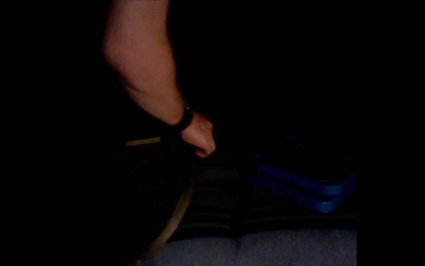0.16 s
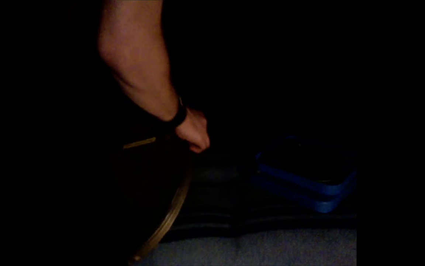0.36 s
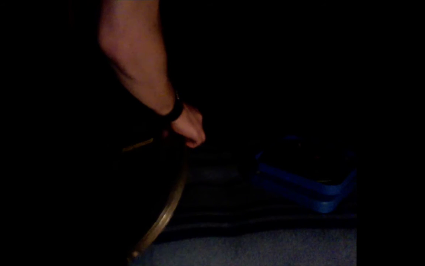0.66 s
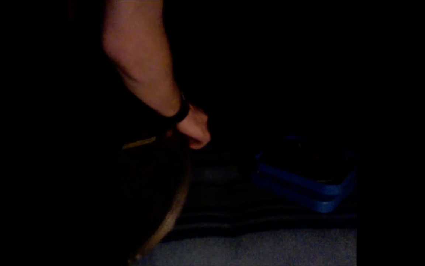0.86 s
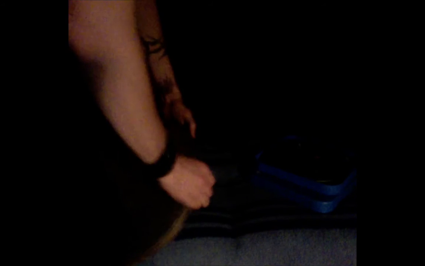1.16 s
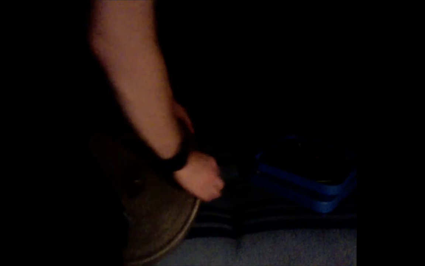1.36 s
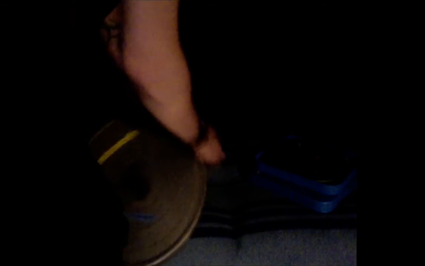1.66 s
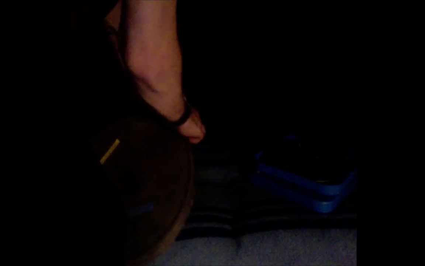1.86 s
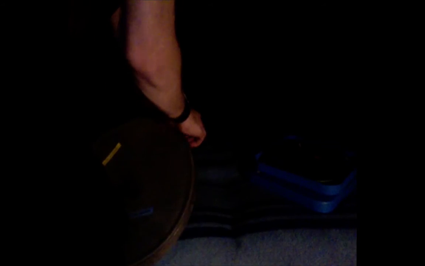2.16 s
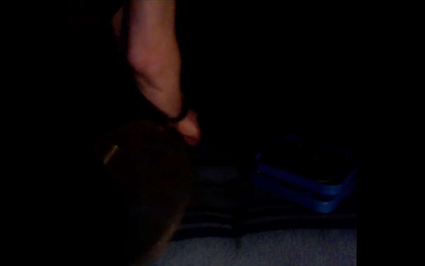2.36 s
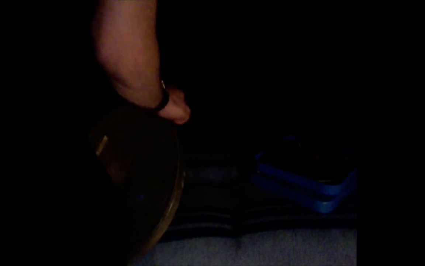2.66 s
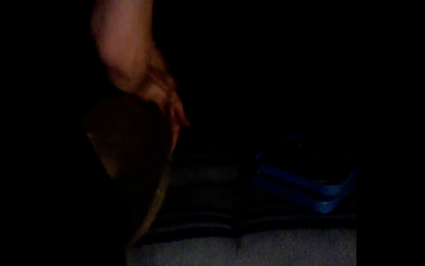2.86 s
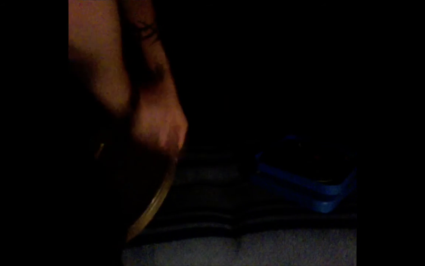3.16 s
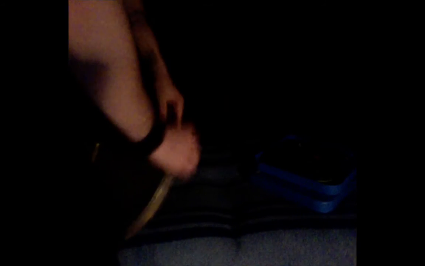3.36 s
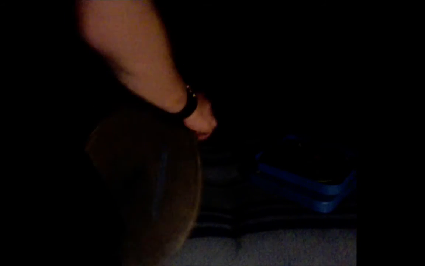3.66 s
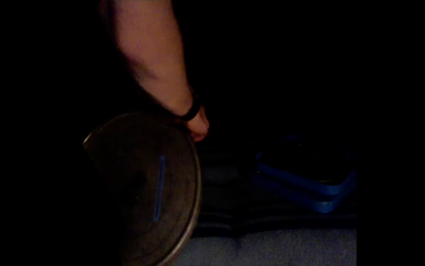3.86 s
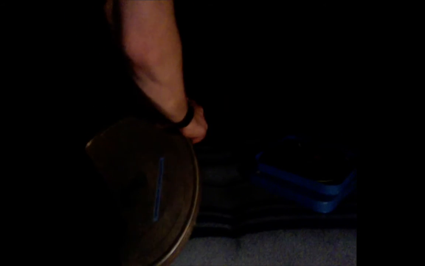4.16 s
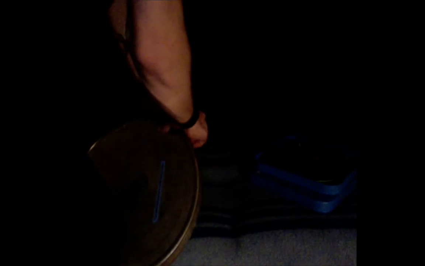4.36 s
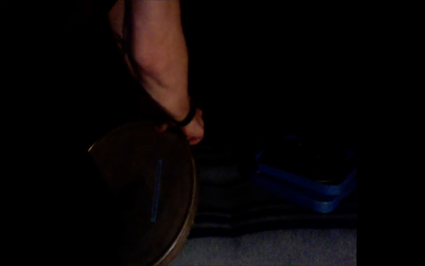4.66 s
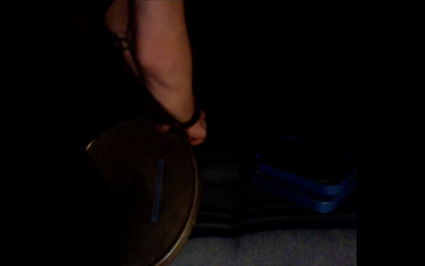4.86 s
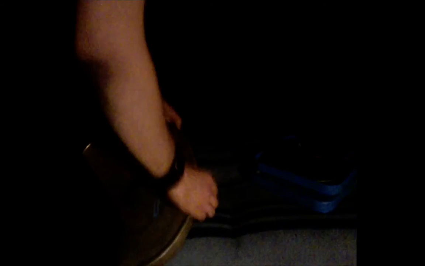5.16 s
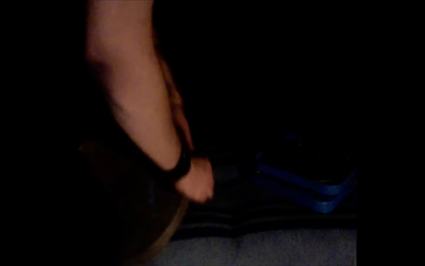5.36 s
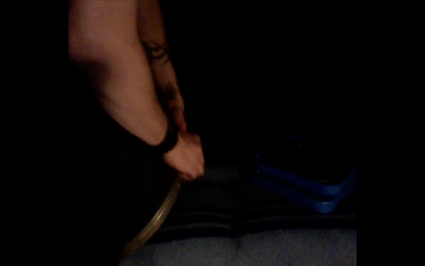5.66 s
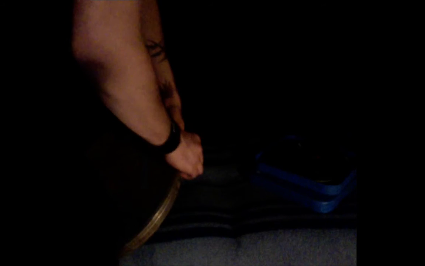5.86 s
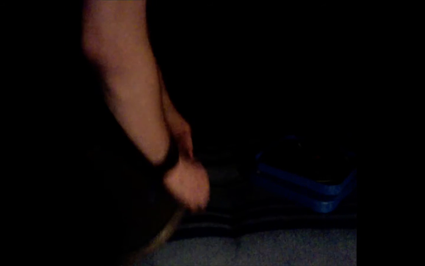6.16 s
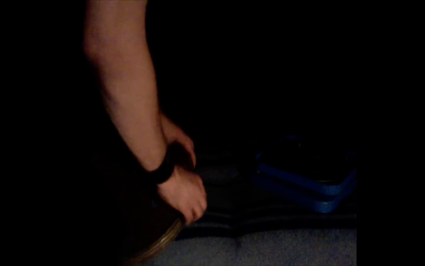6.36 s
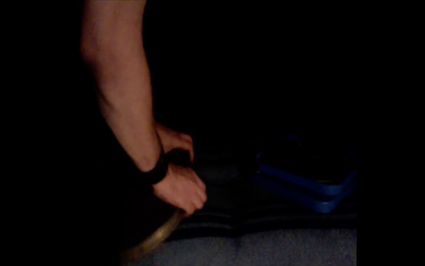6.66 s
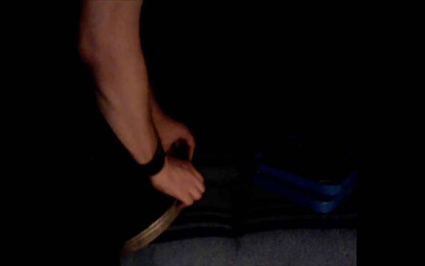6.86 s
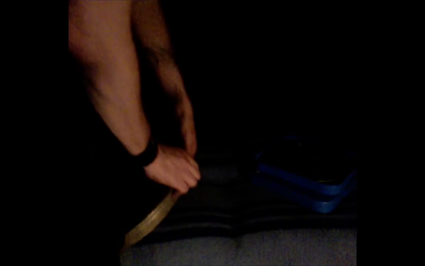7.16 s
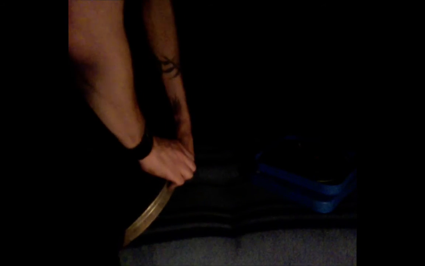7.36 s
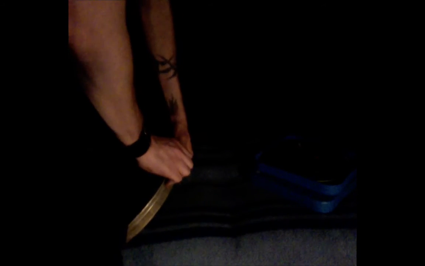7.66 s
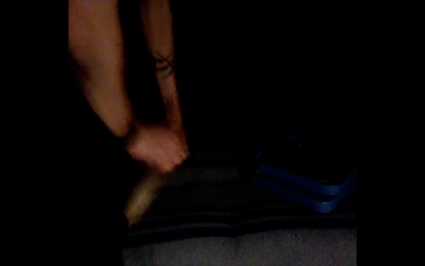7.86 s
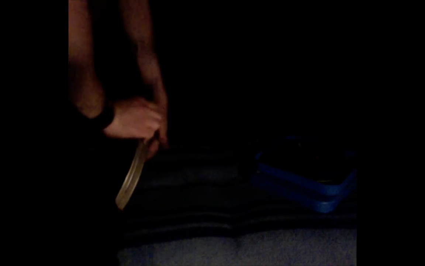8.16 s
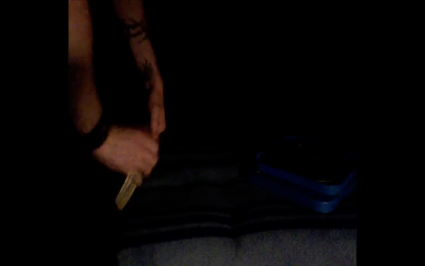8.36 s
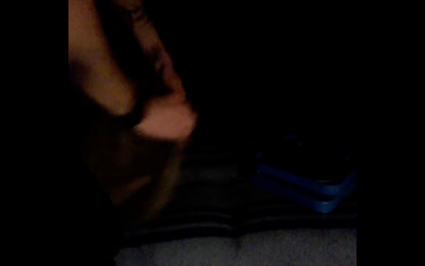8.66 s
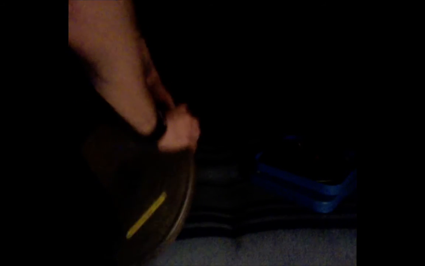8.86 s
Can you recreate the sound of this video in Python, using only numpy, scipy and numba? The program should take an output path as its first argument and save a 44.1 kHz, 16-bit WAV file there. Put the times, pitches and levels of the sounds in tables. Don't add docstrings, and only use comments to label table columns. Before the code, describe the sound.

Close tinny scraping, clicking and dull hollow clanks as a big metal can's tight lid is worked by hand in a quiet room.

```python
import sys
import numpy as np
from scipy import signal
from scipy.fft import rfft, irfft, next_fast_len
from scipy.io import wavfile
from scipy.ndimage import uniform_filter1d
from numba import njit

SR = 44100
rng = np.random.default_rng(int(sys.argv[2]) if len(sys.argv) > 2 else 0)


def rack_gain(trim_db):
    fader = np.asarray(trim_db, float)
    return 10 ** (fader / 20)


def transcribe(signal):
    frames = np.atleast_2d(signal).T
    limited = np.clip(frames, -1, 1)
    pcm = np.round(limited * 32767).astype(np.int16)
    wavfile.write(sys.argv[1], SR, pcm)


N = 397766

# f/Hz, level/dB, share of the ring time/1
BODY_MODES = [(88, -14, 0.86), (168.6, -10, 0.95), (204.5, -8.5, 1.2), (257.8, -9.5, 1.33),
              (320, -4.5, 1.15), (366.7, -1.5, 1.1), (399.8, 0, 0.75), (458, -10, 2.16),
              (525.5, -2.5, 1.28), (611.3, -6, 1.21), (660, -8, 0.87), (735.3, -9.5, 1.23),
              (810, -11.5, 0.94), (879, -10, 0.68)]
# f/Hz, level/dB, share of the ring time/1
LID_MODES = [(1094, -6, 0.53), (1153, -19.5, 0.93), (1231, -9.5, 0.45), (1339, -5.5, 0.52),
             (1463, -6.5, 0.4), (1672, -7, 0.43), (1916, -6.5, 0.33)]
# f/Hz, width/Hz, level/dB
RIM_MODES = [(2222, 380, -12), (2676, 270, 1.5), (3028, 310, 4), (3625, 540, 0), (4314, 300, 3),
             (4650, 320, -2), (5640, 400, 0), (6200, 260, -9), (6620, 520, -10)]
# f/Hz, width/Hz, level/dB
EDGE_MODES = [(7830, 1600, 1), (9720, 780, -3.5), (10910, 1180, -6.5), (13700, 780, -12),
              (14670, 1100, -20)]
THUMP_WEIGHT_DB = -9


def level(x, db):
    return x * rack_gain(db) / np.sqrt(np.mean(x ** 2))


def band(x, hz, width):
    return signal.lfilter(*signal.iirpeak(hz, hz / width, SR), x)


def walk(rate):
    k = int(SR / rate)
    held = np.repeat(rng.standard_normal(N // k + 1), k)
    return 1.97 * uniform_filter1d(held, k)[:N]


def curves(table):
    s, *columns = np.transpose(table)
    return [np.interp(np.arange(N) / SR, s, c) for c in columns]


def favour(hz, pitch_hz, lift_db, octaves):
    return lift_db * np.exp(-(np.log2(hz / pitch_hz) / octaves) ** 2)


def hush():
    # f/Hz, density/dB per Hz
    spectrum = [(59, -22.5), (81, -0.5), (449, -5.5), (962, -14), (1190, -8), (2060, -12.5), (6000, -21),
                (16000, -42.5)]
    hz, db = np.transpose(spectrum)
    size = next_fast_len(N)
    bins = np.fft.rfftfreq(size, 1 / SR) + 1
    shape = rack_gain(np.interp(np.log(bins), np.log(hz), db))
    air = irfft(rfft(rng.standard_normal(N), size) * shape, size)[:N]
    return level(air * rack_gain(1.5 * walk(12.0)), -68.5)


def stroke(s, level_db, rise, fade, hold=0):
    t = np.arange(N * 1000 // SR + 2) / 1000 - s
    sag_db_s = 56
    swell = rise * np.minimum(t, 0)
    return rack_gain(level_db + swell - sag_db_s * np.clip(t, 0, hold) - fade * np.maximum(t - hold, 0))


def spread(gain):
    return np.interp(np.arange(N) * 1000 / SR, np.arange(len(gain)), gain)


def force():
    # t/s, level/dB
    grip_creep = [(0, -73), (1.3, -65.5), (1.56, -55), (2.23, -72), (3.2, -66), (3.6, -68), (3.9, -65),
                  (4.44, -74.5), (4.7, -76), (5.1, -63), (5.47, -70), (5.71, -59), (5.82, -72),
                  (6.25, -61.5), (6.5, -66.5), (6.8, -99), (8.3, -65), (9.02, -71)]
    # t of full force/s, build-up/s, hold/s, level/dB, lid buzz/dB
    drag_table = [(0.052, 0.067, 0.0048, -46.5, -19), (0.757, 0.17, 0.13, -44.5, -10.5),
                  (1.001, 0.62, 0.01, -36.5, -8.5), (1.123, 0.19, 0.029, -54.5, 2),
                  (1.404, 0.03, 0.02, -35, -26), (2.358, 0.041, 0.015, -34.5, -2.5),
                  (2.413, 0.013, 0.064, -28.5, -18), (2.515, 0.026, 0.05, -43, 1.5),
                  (2.901, 0.1, 0.049, -38.5, -7), (3.377, 0.037, 0.0037, -34, -4),
                  (3.629, 0.029, 0.056, -36, -2), (3.722, 0.078, 0.081, -43, 0.5),
                  (4.976, 0.064, 0.11, -50.5, -30), (6.046, 0.008, 0.07, -51.5, -25),
                  (6.135, 0.18, 0.04, -49, -23), (6.65, 0.033, 0.013, -64.5, -6),
                  (5.257, 0.03, 0.0034, -31.5, -20), (7.187, 0.2, 0.013, -53, -38),
                  (7.742, 0.015, 0.21, -46.5, 4), (7.95, 0.26, 0.084, -33, -3),
                  (8.193, 0.016, 0.041, -36.5, -20), (8.851, 0.045, 0.025, -44.5, -1.5),
                  (8.805, 0.16, 0.0092, -55, -12)]
    # t/s, level/dB, fade/(dB/s), lid buzz/dB
    jolt_table = [(.305, -99, 114, -1), (.439, -63, 374, 15), (0.531, -41, 161, 3.5),
                  (1.273, -54.5, 171, -4), (1.303, -66, 283, -1), (2.247, -62.5, 166, 21),
                  (2.47, -34, 305, 2), (1.438, -47.5, 154, -13), (2.843, -53, 107, 4),
                  (3.279, -49.5, 178, -13), (4.498, -58.5, 363, -17), (4.574, -71, 197, 0),
                  (4.872, -39.5, 270, 7), (5.268, -39, 152, 1), (5.863, -68.5, 229, 9),
                  (5.933, -53, 185, -60), (6.517, -42, 284, 10.5), (6.392, -80, 298, -7),
                  (6.631, -57.5, 191, 10), (7.075, -66, 59, -10), (7.35, -42.5, 266, 0.5),
                  (7.456, -49.5, 201, 5.5), (7.561, -40, 215, 7.5), (7.716, -45.5, 246, -23),
                  (7.883, -42.5, 300, 4), (1.014, -39.5, 239, 4), (.5, -56.5, 300, 8),
                  (1.385, -49, 500, -22), (8.352, -65, 159, 15), (5.11, -77, 193, -7),
                  (8.401, -72, 276, 19), (8.466, -77, 351, 21), (8.562, -64, 302, 25.5)]
    # t of full force/s, build-up/s, hold/s, level/dB, lid buzz/dB
    slide_table = [(0.942, 0.032, 0.052, -54, -21), (1.16, 0.045, 0.024, -61.5, -26),
                   (2.314, 0.034, 0.027, -45.5, 2), (3.557, 0.022, 0.016, -67, -28),
                   (4.939, 0.11, 0.1, -55, -28.5), (5.04, 0.06, 0.033, -56, -25),
                   (5.248, 0.0076, 0.016, -59, -13), (6.054, 0.015, 0.056, -59, -23),
                   (6.152, 0.079, 0.059, -57, -11), (5.955, 0.032, 0.062, -69, -19),
                   (7.758, .008, 0.069, -48, -11), (7.364, 0.027, 0.015, -61, 8),
                   (8.186, 0.0093, 0.033, -58, -21), (2.9, 0.086, 0.04, -47, 5),
                   (7.881, 0.082, 0.17, -47, -18), (8.892, 0.059, 0.058, -61, -24)]
    jolt_rise_db_s, build_db = 6000, 51
    jolt_dry_db, drag_dry_db, slide_dry_db, grip_dry_db = -22.5, -20, -5.5, -13
    gestures = []
    for s, db, fade, buzz in jolt_table:
        gestures.append((stroke(s, db, jolt_rise_db_s, fade), jolt_dry_db, buzz))
    for s, build, hold, db, buzz in drag_table:
        let_go = 214.5 + 10.5 / build
        gestures.append((stroke(s, db, build_db / build, let_go, hold), drag_dry_db, buzz))
    for s, build, hold, db, buzz in slide_table:
        gestures.append((stroke(s, db, build_db / build, 452, hold), slide_dry_db, buzz))
    gains = sum(gain * rack_gain([[0], [dry_db - 0.27 * buzz], [buzz]]) for gain, dry_db, buzz in gestures)
    resting = rack_gain(curves(grip_creep)[0]) * rack_gain([[0], [grip_dry_db], [0]])
    return np.array([spread(g) for g in gains]) + resting


def grit(rate, spread_db):
    slips = (rng.random(N) < rate / SR) * np.clip(rng.standard_normal(N), -2, 2)
    return slips * rack_gain(spread_db * np.minimum(rng.exponential(size=N), 3.6))


def shifting(source, table, drift_db, spot_hz=1, lift_db=1.5):
    sources = source(), source()
    total = 0
    for k, (hz, width, db) in enumerate(table):
        gain = rack_gain(db + drift_db * walk(14) + favour(hz, spot_hz, lift_db, 0.27))
        steep = band(band(sources[k % 2], hz, 2.57 * width), hz, 3.14 * width)
        total = total + gain * steep * (-1) ** k
    return level(total, 0)


def scrape():
    # t/s, f/Hz
    rim_spot = [(0, 3000), (.7, 3000), (.85, 4500), (.97, 4470), (1.03, 2400), (1.4, 3980), (2.3, 4410),
                (2.9, 3160), (3.3, 5000), (3.38, 2780), (3.75, 4400), (5, 3600), (5.27, 2970), (6.1, 3270),
                (7.5, 2940), (7.9, 3800), (8.24, 4640), (8.45, 2485)]
    # t/s, f/Hz
    lid_spot = [(0, 1267), (.7, 1602), (1.3, 1283), (2.3, 1516), (3.4, 1660), (4.9, 1424), (6.5, 1147),
                (7.4, 1600), (7.9, 1290), (8.2, 1880), (8.6, 1820)]

    def rough():
        return grit(9000, 2.8)

    on_rim, on_edge, on_lid = force() * rack_gain(1.2 * walk(60) + 0.6 * walk(230))
    lid_bands = [(hz, 90, db) for hz, db, _ in LID_MODES]
    rim = shifting(rough, RIM_MODES, 1.7, curves(rim_spot)[0]) * on_rim
    edge = shifting(rough, EDGE_MODES, 2.24) * on_edge * rack_gain(0.5)
    lid = shifting(rough, lid_bands, 1.4, curves(lid_spot)[0], lift_db=2.5) * on_lid * rack_gain(-5.5)
    return (rim + edge + lid) * rack_gain(-5.0)


def body_rumble():
    # t/s, level/dB, swell/(dB/s), fade/(dB/s)
    rumble_table = [(.07, -60, 296, 44), (.33, -53, 406, 83), (.545, -33, 398, 202), (.75, -73, 300, 40),
                    (.93, -46.5, 122, 74), (1.05, -74, -3, 66), (1.25, -49.5, 74, 61), (1.62, -64, 43, 9),
                    (2.451, -22, 196.5, 247), (2.56, -53, 202, 208), (2.93, -45.5, 321, 123),
                    (3.372, -51, 783, 196), (3.78, -79, 85, 206), (3.624, -39, 2002, 86),
                    (4.15, -61, 62, 97), (4.26, -65, 200, 197), (4.372, -58, 2000, 104),
                    (4.45, -62, 2000, 201), (4.63, -62, 84, 252.5), (4.91, -39, 491, 151),
                    (5.29, -49.5, 392, 120), (5.66, -62, 48, 53), (5.95, -62, 74, 48),
                    (6.054, -57, 1500, 195), (6.36, -65, 34, 82), (6.547, -27.5, 598, 231),
                    (7.09, -77, 583, 105), (7.18, -77, 309, 90), (7.3, -56.5, 100, 100),
                    (7.4, -51.5, 69.5, 49), (7.598, -41, 121, 205), (7.8, -46, 499, 252),
                    (7.84, -32.5, 251, 82), (8.02, -46, 100, 300), (8.3, -60.5, 67, 88),
                    (8.87, -44, 236, 215)]
    press = grit(400, 1.0) * rack_gain(1.8 * walk(25))
    roll_off_db = -4
    modes = [(hz, 30, db + roll_off_db * max(np.log2(hz / 450), 0)) for hz, db, _ in BODY_MODES]
    body = shifting(lambda: press, modes, 2.0)
    return body * spread(sum(stroke(*row) for row in rumble_table)) * rack_gain(-2.5)


@njit
def ring(hz, t60, gain, rise, size):
    y = np.zeros(size)
    for k in range(len(hz)):
        turn = np.exp((2j * np.pi * hz[k] - np.log(1000) / t60[k]) / SR)
        z = gain[k] + 0j
        q, rest = np.exp(-1 / (rise[k] * SR)), 1.
        for i in range(size):
            y[i] += z.imag * (1 - rest)
            z *= turn
            rest *= q
    return y


def add(out, s, sound, peak_db):
    i = int(s * SR)
    sound = sound[:N - i]
    out[i:i + len(sound)] += sound * rack_gain(peak_db) / np.abs(sound).max()


def knocks(blows):
    out = np.zeros(N)
    hz, db, share = np.repeat(np.transpose(BODY_MODES + LID_MODES), repeats=2, axis=1)
    lid_hz = LID_MODES[0][0]
    lid, deep = hz >= lid_hz, hz <= BODY_MODES[3][0]
    chance = rng.standard_normal((len(blows), 5, len(hz)))
    lags = rng.random((len(blows), 2))
    for blow, (detune, uneven, *sides), lag in zip(blows, chance, lags):
        s, peak_db, pitch, t60, bright_db, weight_db = blow
        colour_db = favour(hz, pitch, 9.0, 0.28)
        colour_db += lid * (bright_db + 12.5 - 8 * np.log2(hz / lid_hz))
        colour_db += deep * (weight_db + 21.5)
        colour_db += (weight_db - THUMP_WEIGHT_DB) * np.clip(np.log2(pitch / hz) - .4, 0, 1)
        gain = rack_gain(db + 3.26 * uneven + colour_db)
        tuned = hz * (1 + np.where(deep, .012, .025) * detune)
        life = 1.83 * np.clip(t60, .02, .3) * share
        rise = 0.68 / hz
        delays = [0, 0.004067 + 0.00801 * lag[0], .014 + 0.017 * lag[1]]
        for side, late, drop_db in zip(sides, delays, [-4, -13.5, -17]):
            sound = ring(tuned, life, gain * np.sign(side), rise, size=10000)
            add(out, s - .0002 + late, sound, peak_db + drop_db)
    return out


def hand_blows():
    # t/s, peak level/dB, favoured f/Hz, ring time/s, brightness/dB
    palms = [(.028, -40.5, 356, 0.084, -13), (.292, -14, 327, 0.05, -28), (.437, -23, 322, 0.026, -11.5),
             (.499, -30.5, 388, 0.023, -9), (.53, -21.5, 354.6, 0.049, -9), (.881, -39, 540, 0.11, -16),
             (1.434, -28, 347, 0.017, 2.5), (2.12, -30, 500, 0.071, -22), (2.225, -29.5, 383, 0.076, -30),
             (2.315, -24.5, 430, 0.074, -19), (2.353, -19, 320, 0.047, -13), (2.429, -7, 360, 0.11, -14.5),
             (2.895, -24, 320, 0.083, -13), (3.643, -20, 437, 0.063, -7), (4.052, -38, 464, 0.068, -17),
             (7.381, -30.5, 740, 0.057, -12.5), (7.456, -29.5, 384, 0.021, -7),
             (8.038, -19, 460, 0.042, -10.5), (8.793, -40, 318, 0.03, -24), (8.831, -32, 403, 0.14, -7)]
    # t/s, peak level/dB, favoured f/Hz, ring time/s, brightness/dB
    taps = [(.077, -35, 400, 0.081, -15), (.19, -44, 342, 0.056, -14), (1.268, -33, 1220, 0.076, -16),
            (1.381, -33, 1320, 0.17, 4), (1.24, -41.5, 397, 0.056, -7), (1.383, -33, 400, 0.032, -11),
            (2.299, -39, 450, 0.029, -28), (3.585, -44.5, 520, 0.019, -31), (5.256, -42, 496, 0.037, -16),
            (2.84, -37, 406, 0.15, -16), (3.099, -36.5, 400, 0.031, -13), (3.405, -34.5, 380, 0.058, 2.5),
            (4.228, -35.5, 384, 0.091, -23), (4.87, -21.5, 483, 0.098, -14), (5.27, -32, 700, 0.12, -23),
            (5.614, -41, 384, 0.085, -19), (5.716, -36, 476, 0.028, -28), (5.856, -39, 398, 0.04, -21),
            (5.943, -35, 413, 0.06, -21), (7.884, -27.5, 660, 0.076, -5), (8.397, -36.5, 480, 0.02, -11),
            (8.466, -35.5, 870, 0.055, 0.5), (8.561, -35.5, 865, 0.044, -5.5)]
    # t/s, peak level/dB, favoured f/Hz, ring time/s, brightness/dB
    regrips = [(.62, -40, 486, 0.041, -13), (.742, -45, 561.6, 0.09, -25), (1.024, -30, 333, 0.034, -27),
               (2.072, -46, 380, 0.062, -30), (2.249, -52, 1850, 0.064, 10), (6.049, -41.5, 537, 0.11, -15),
               (6.59, -33.5, 540, 0.066, -21), (7.095, -49, 356.4, 0.056, -30),
               (7.161, -42.5, 338.9, 0.063, -27), (7.225, -53, 416.7, .04, -15),
               (7.282, -43, 369, 0.063, -21), (7.79, -28, 185.2, 0.068, -32), (7.96, -21, 189, 0.051, -35),
               (8.1, -35, 453.6, 0.039, -25), (8.197, -53, 1890, 0.071, 10), (8.396, -41, 2106, 0.099, 5),
               (8.465, -39, 2106, 0.11, 12), (8.56, -39, 2000, 0.097, 10), (8.655, -51.5, 350, 0.04, -20)]
    # t/s, peak level/dB, favoured f/Hz, ring time/s, brightness/dB
    thumps = [(1.009, -23, 340, 0.064, -36), (1.298, -30, 430, 0.093, -2), (2.089, -43, 390, 0.18, -12),
              (2.413, -23.5, 357, 0.073, 17), (4.122, -34, 382, 0.033, -8.5),
              (4.494, -30.5, 390, 0.056, -12.5), (4.563, -35.5, 393, 0.13, -20),
              (4.615, -37.5, 317, 0.025, -30), (3.621, -32, 415, 0.063, -15),
              (6.509, -20.5, 212, 0.061, -42), (6.5, -12.5, 480, 0.095, -22),
              (7.071, -35.5, 290, 0.056, -44), (7.559, -23, 407, 0.042, -10), (7.75, -29.5, 458, 0.12, -8),
              (7.8, -16, 404, 0.024, -15), (7.855, -26, 400, 0.051, -6.5), (7.954, -17, 410, 0.091, -15)]
    kinds = (thumps, THUMP_WEIGHT_DB), (palms, -14), (taps, -25), (regrips, -13.5)
    return knocks(sorted((*row, weight_db) for rows, weight_db in kinds for row in rows))


def ticks(flicks):
    out = np.zeros(N)
    hz, width, db = np.repeat(np.transpose(RIM_MODES + EDGE_MODES), repeats=6, axis=1)
    edge = hz > (RIM_MODES[-1][0] + EDGE_MODES[0][0]) / 2
    chance = rng.standard_normal((len(flicks), 3, len(hz)))
    for (s, peak_db, pitch, sharp_db), (detune, uneven, side) in zip(flicks, chance):
        colour_db = favour(hz, pitch, 15.9, 0.053) + edge * (sharp_db + 14.5)
        gain = rack_gain(db + 2.2 * uneven + colour_db) * np.sign(side)
        life = 0.043 * (4000 / hz) ** 0.48
        rise = np.full(len(hz), 0.0001)
        sound = ring(hz + 0.549 * width * detune, life, gain, rise, size=3000)
        add(out, s - .0003, sound, peak_db)
    return out


def rim_flicks():
    # t/s, peak level/dB, favoured f/Hz
    nails = [(.033, -43, 2670), (.4359, -37.5, 2450), (.5343, -36, 4200), (1.3818, -26.5, 5770),
             (1.4055, -47, 4160), (2.2463, -50.5, 2200), (2.355, -22.5, 4770), (2.4652, -24, 4750),
             (3.2766, -30, 5200), (3.6388, -26, 2950), (4.2254, -55, 2970), (4.575, -49, 2800),
             (4.6114, -57, 2820), (4.8179, -53, 5500), (4.8704, -27, 2770), (5.8601, -42.5, 4650),
             (5.9266, -36, 4830), (6.353, -46.5, 3550), (7.072, -53, 2800), (7.379, -33.5, 2940),
             (7.5517, -35, 2770), (7.5588, -26.5, 2800), (8.8, -41.5, 2880)]
    # t/s, peak level/dB, favoured f/Hz
    snaps = [
        (.2588, -48.5, 2820),
        (.5, -52, 6850),
        (.5856, -39.5, 3950),
        (1.1436, -41, 6700),
        (1.4374, -30, 5640),
        (2.4143, -23, 3140),
        (3.5558, -50.5, 2740),
        (4.118, -51.5, 2960),
        (7.7493, -36, 4350),
        (8.0385, -29.5, 4730),
    ]
    # t/s, peak level/dB, favoured f/Hz
    clicks = [(.301, -48.5, 2820), (1.2685, -39, 2900), (1.2974, -39, 3200), (2.1226, -52.5, 3250),
              (2.8437, -42, 3150), (3.3047, -38, 4800), (4.0964, -44, 6800), (4.459, -49.5, 2680),
              (4.4947, -42.5, 2800), (5.1078, -38.5, 2720), (5.2011, -47, 4400), (5.2663, -19, 2820),
              (6.0535, -36.5, 2600), (6.5104, -40, 4430), (6.5229, -35.5, 4650), (6.6233, -39.5, 2660),
              (7.3396, -34.5, 2680), (7.3597, -34, 2680), (7.444, -46, 3000), (7.8592, -42, 3000),
              (3.358, -35, 2930), (8.243, -44, 4670), (8.194, -35, 4670), (7.4579, -31.5, 2900),
              (7.4906, -32, 2930), (7.7177, -27.5, 2850), (7.882, -32.5, 4670), (7.9503, -21, 2220),
              (8.3956, -47, 2200), (8.4642, -39.5, 2680), (8.5586, -35, 2840), (8.834, -35, 2920)]
    # t/s, peak level/dB, favoured f/Hz
    catches = [(0.499, -62, 2730), (0.698, -48, 3270), (0.7353, -43, 4370), (0.788, -47, 3000),
               (1.0104, -25, 2300), (4.052, -58, 3000), (4.2, -56, 2200), (4.371, -63, 9700),
               (5.935, -40.5, 4300), (6.15, -38, 2860), (6.265, -64, 2850), (6.389, -46.5, 3800),
               (7.884, -43, 3460), (8.228, -37, 4570), (8.561, -40, 3060)]
    kinds = (snaps, -5), (nails, -15.5), (clicks, -28), (catches, -40)
    return ticks(sorted((*row, sharp_db) for rows, sharp_db in kinds for row in rows))


def room():
    # f/Hz, t60/s
    decay = [(300, 0.23), (1200, 0.21), (4000, 0.043), (10000, 0.034)]
    t = np.arange(SR // 2) / SR
    tail = 0
    for hz, t60 in decay:
        noise = band(rng.standard_normal(len(t)), hz, 2.2 * hz)
        tail = tail + noise * 1000. ** (-t / t60) / np.sqrt(hz)
    gap = 1 - np.exp(-(t / 0.00081) ** 2)
    tail = signal.lfilter([1, -.9], [1], tail * gap)
    return tail / np.sqrt(np.sum(tail ** 2))


def scene():
    air = hush()
    rubbing = scrape() + body_rumble()
    low = hand_blows()
    high = rim_flicks() + rubbing
    wet = rack_gain(-3) * low + rack_gain(-9) * high
    return (low + high + signal.fftconvolve(wet, room())[:N] + air)[None, :]


def roll_off(x):
    return signal.sosfilt(signal.butter(12, 15830, fs=SR, output="sos"), x)


def record(dry):
    dipped = dry - 0.54 * band(dry, 1043, 53)
    thin = signal.sosfilt(signal.butter(4, 90, "high", fs=SR, output="sos"), dipped)
    thin = signal.sosfilt(signal.butter(8, 15600, fs=SR, output="sos"), thin)
    ceiling = .14
    return roll_off(np.clip(thin, -ceiling, ceiling))


dry = scene()
out = record(dry)
transcribe(out)
```